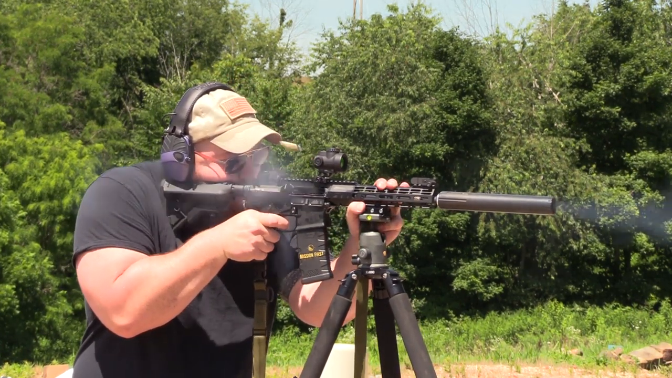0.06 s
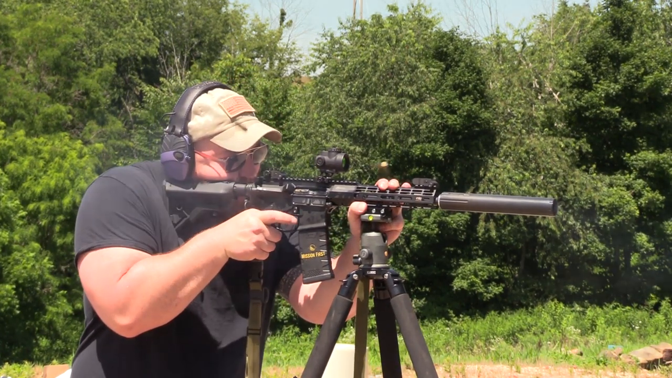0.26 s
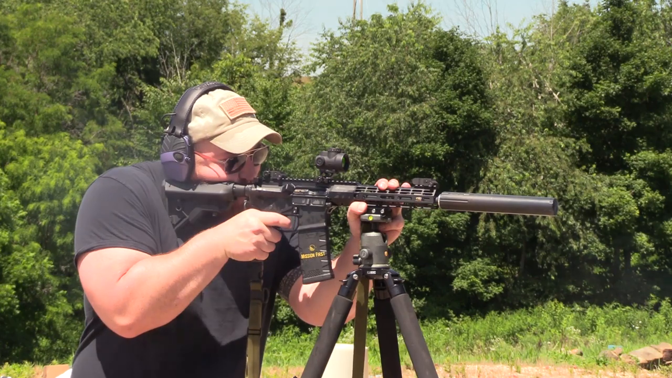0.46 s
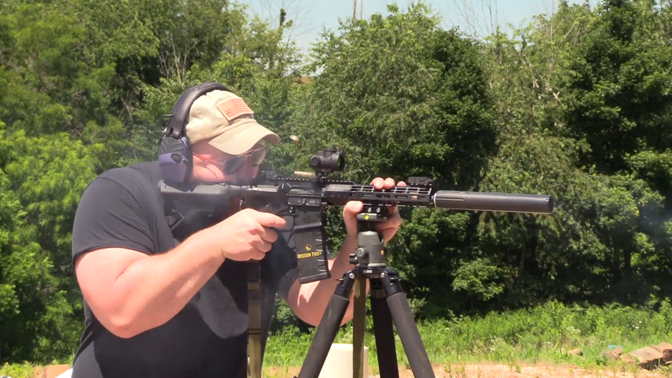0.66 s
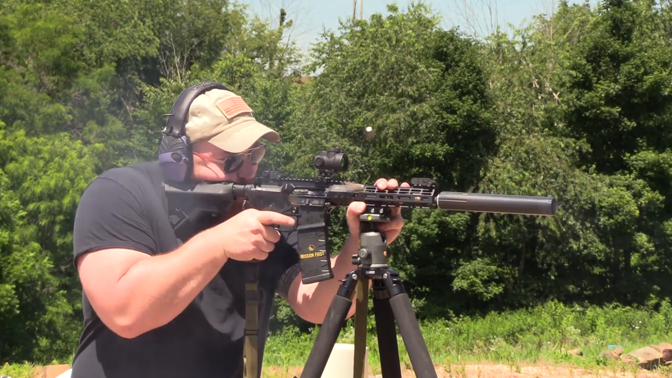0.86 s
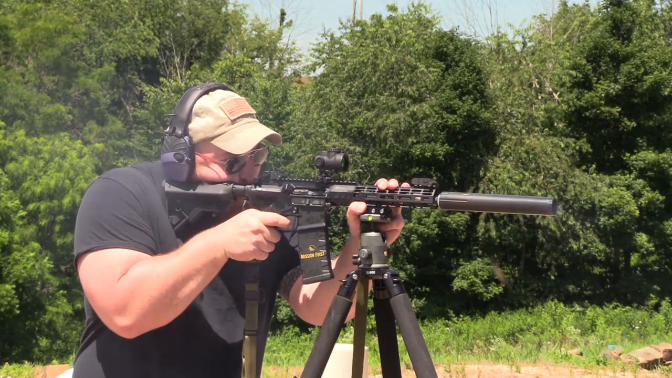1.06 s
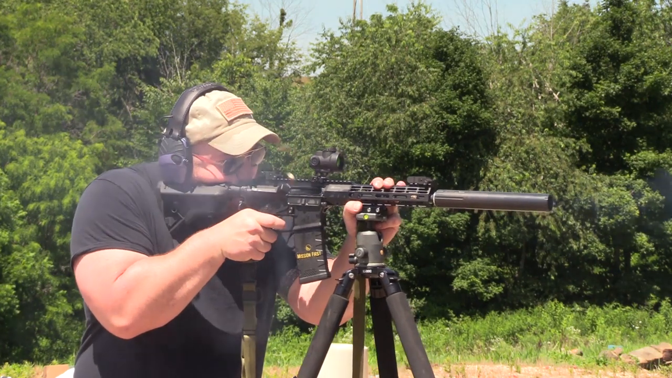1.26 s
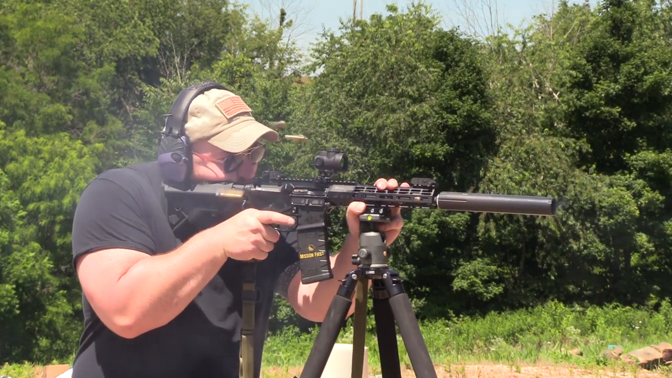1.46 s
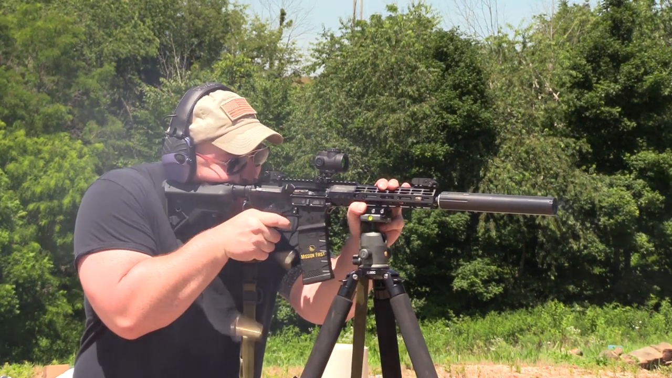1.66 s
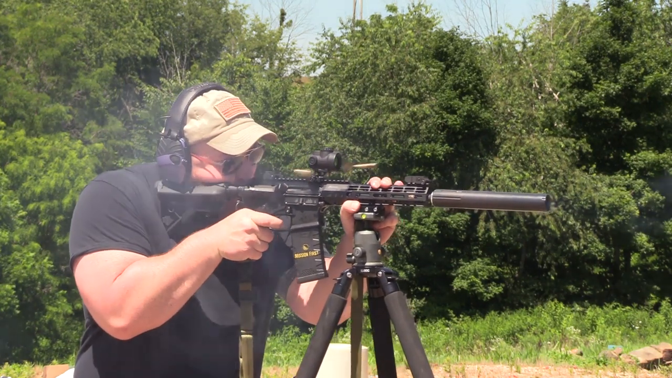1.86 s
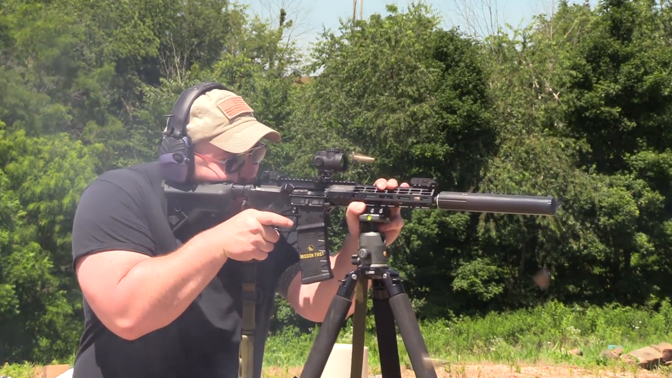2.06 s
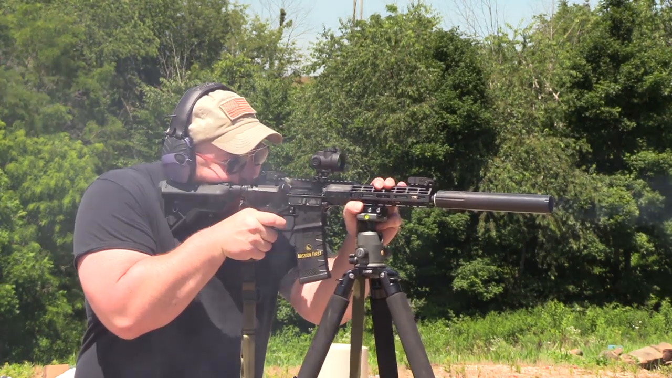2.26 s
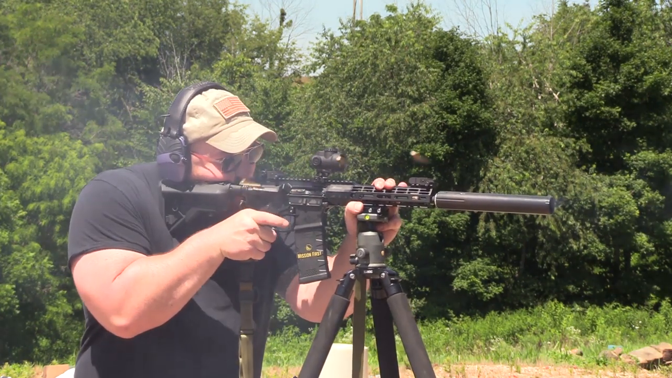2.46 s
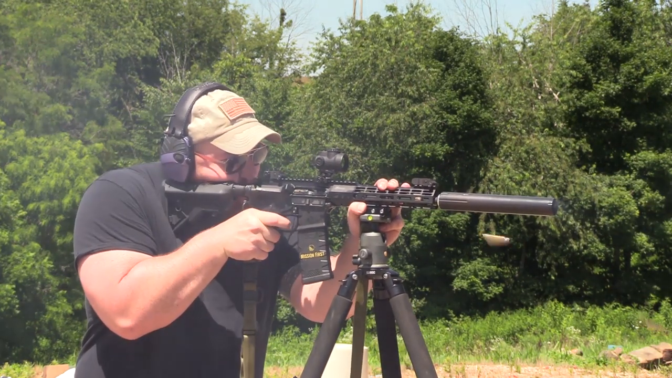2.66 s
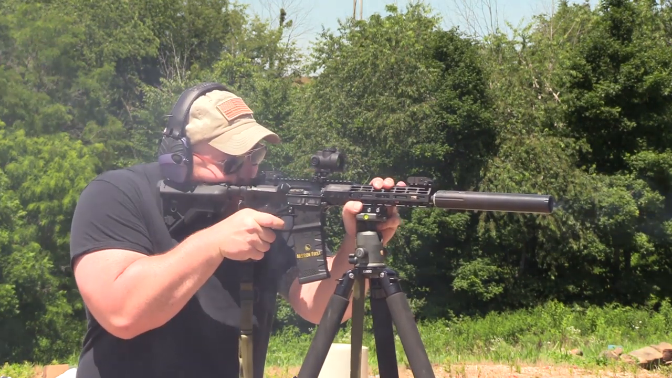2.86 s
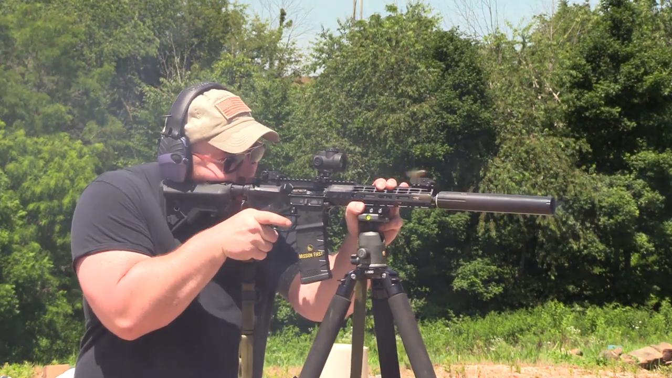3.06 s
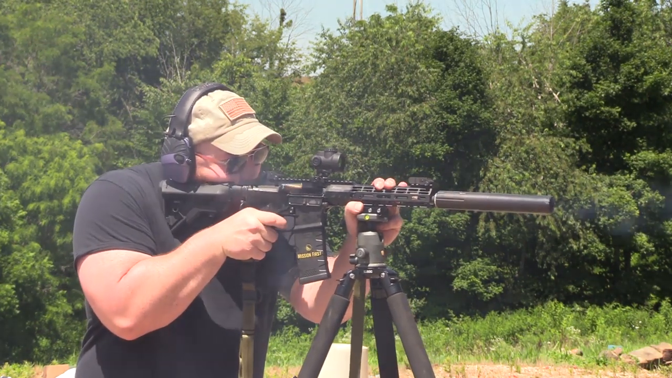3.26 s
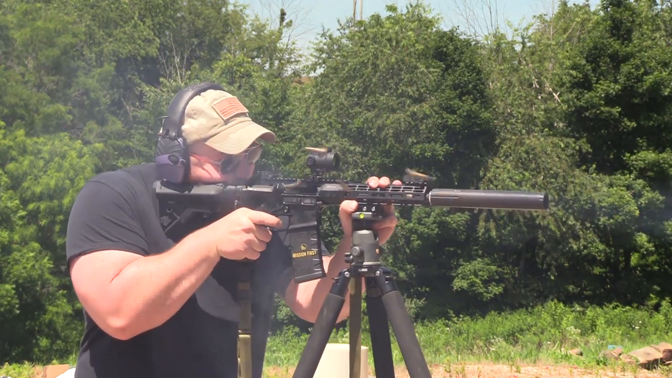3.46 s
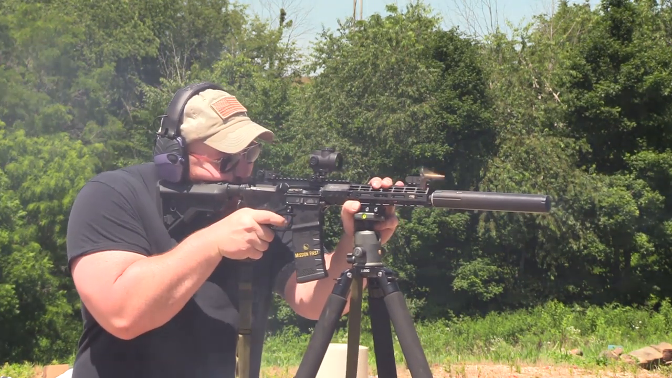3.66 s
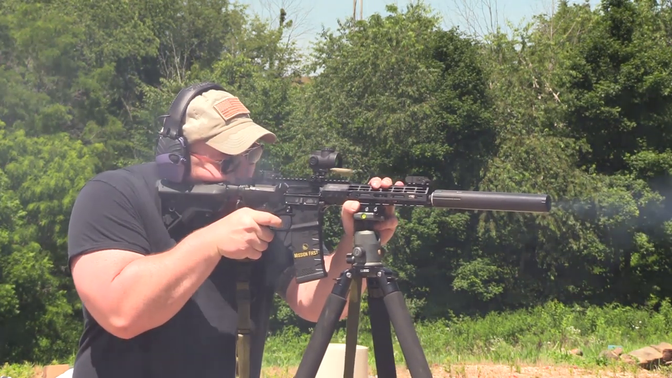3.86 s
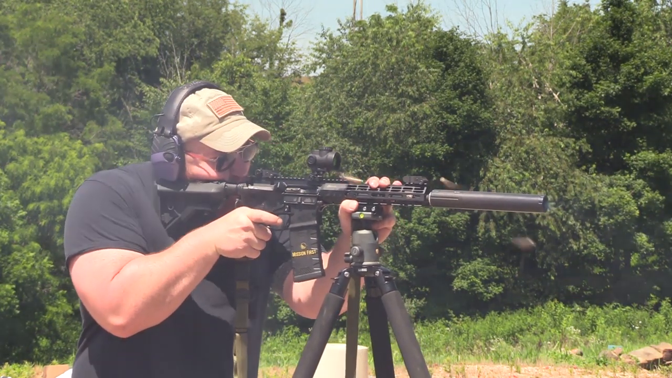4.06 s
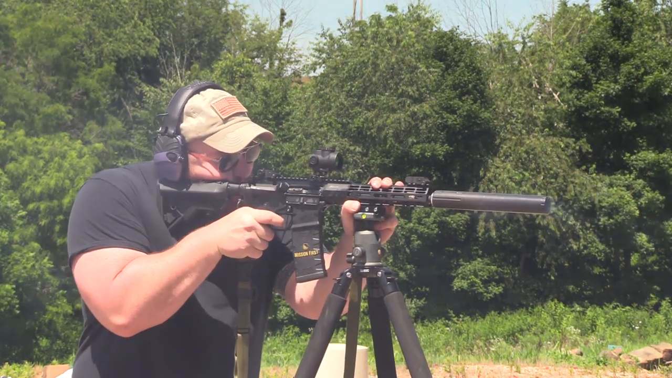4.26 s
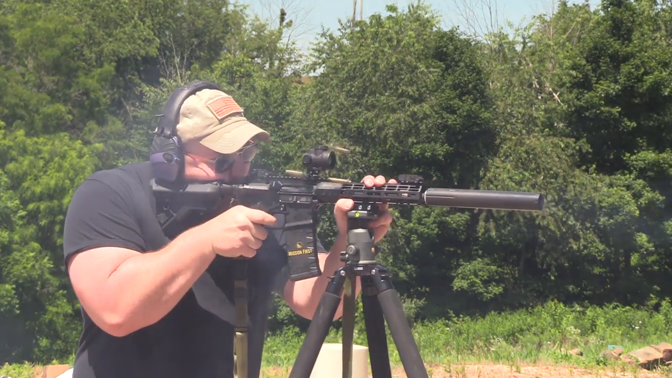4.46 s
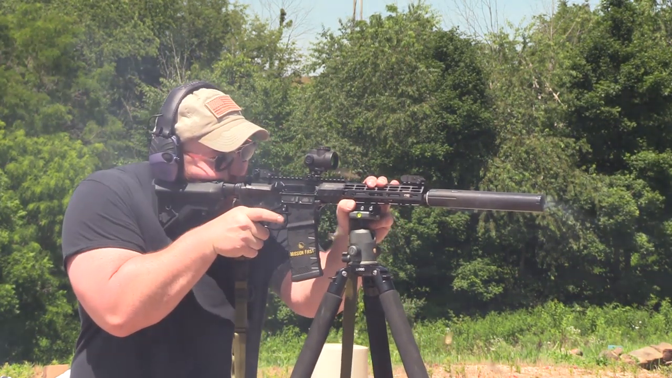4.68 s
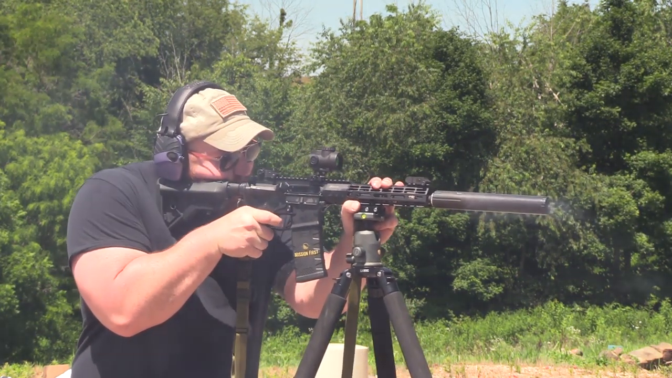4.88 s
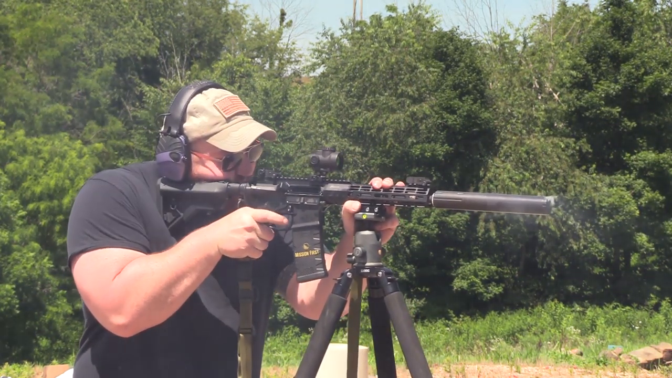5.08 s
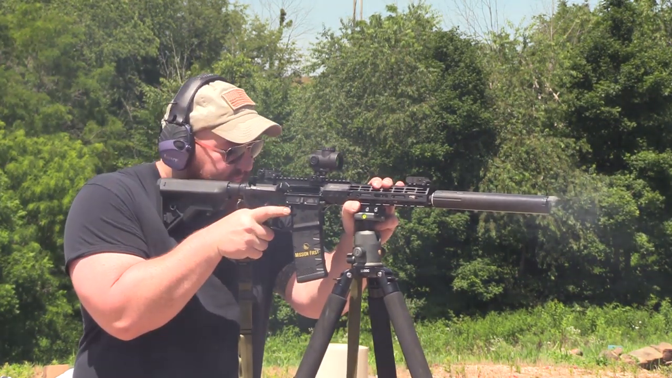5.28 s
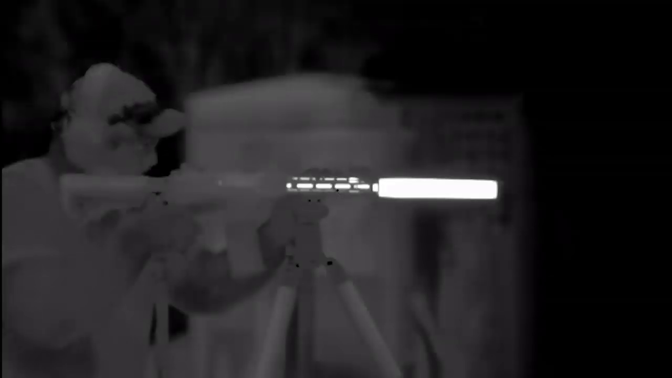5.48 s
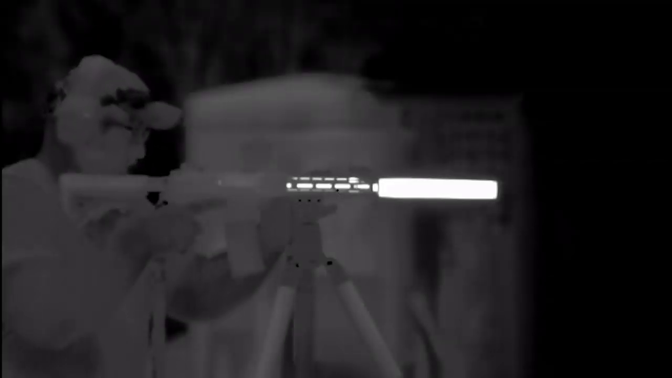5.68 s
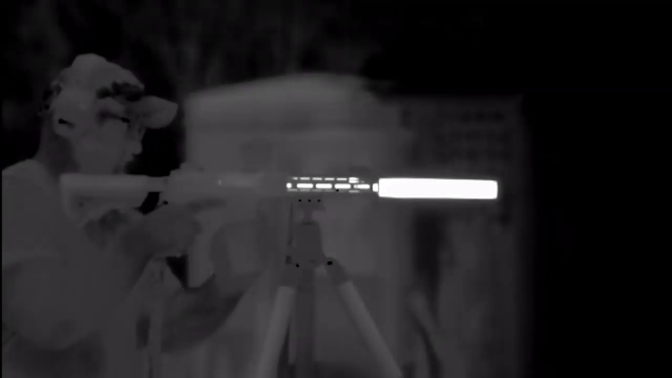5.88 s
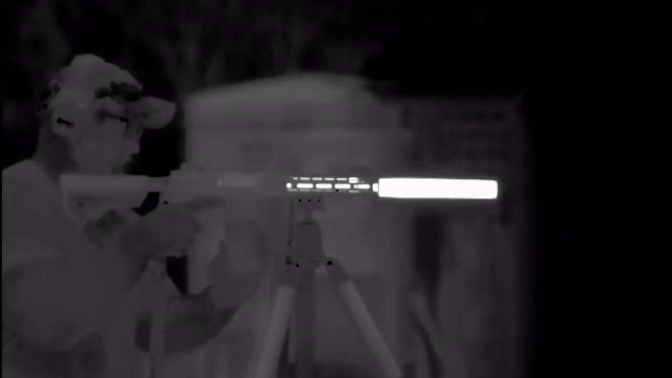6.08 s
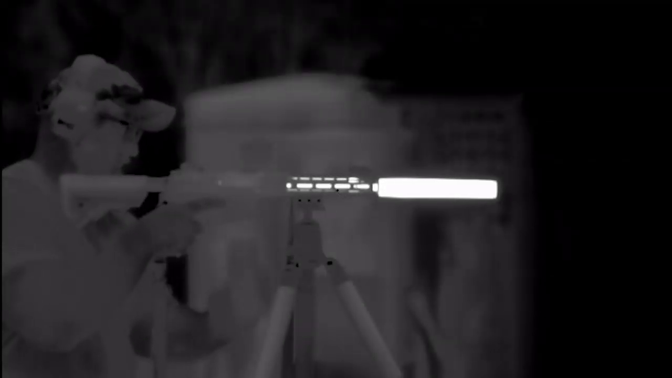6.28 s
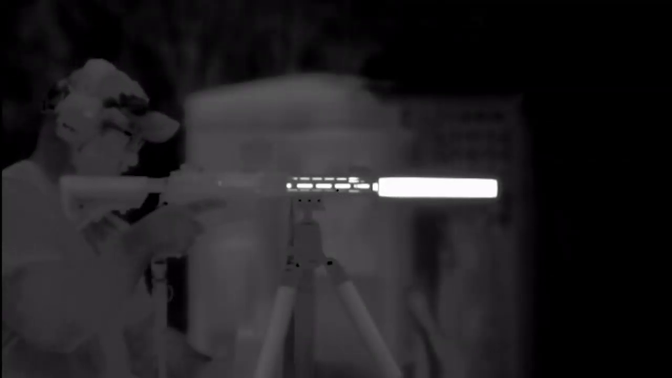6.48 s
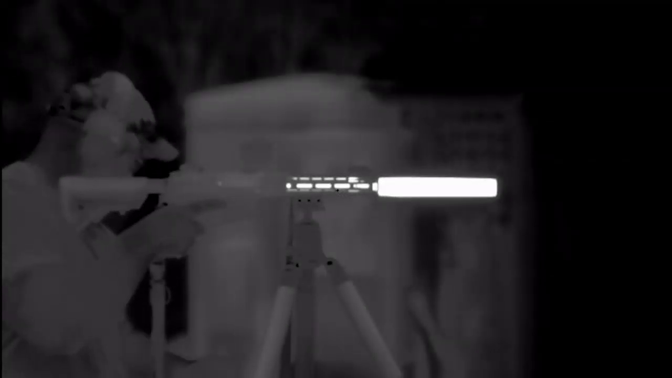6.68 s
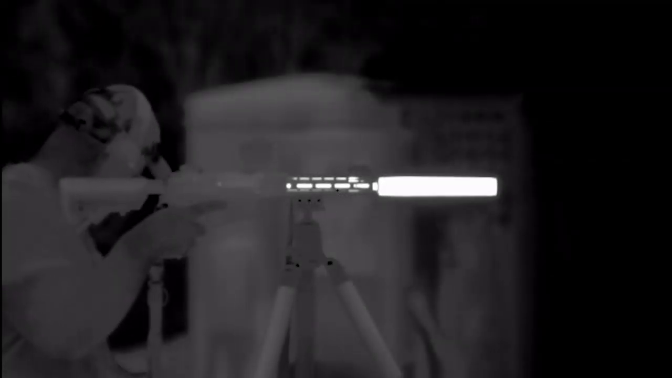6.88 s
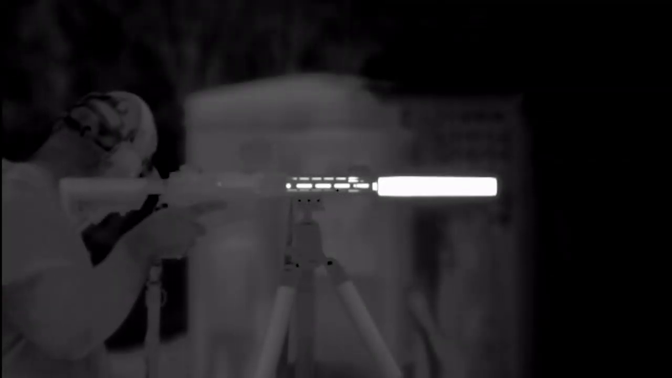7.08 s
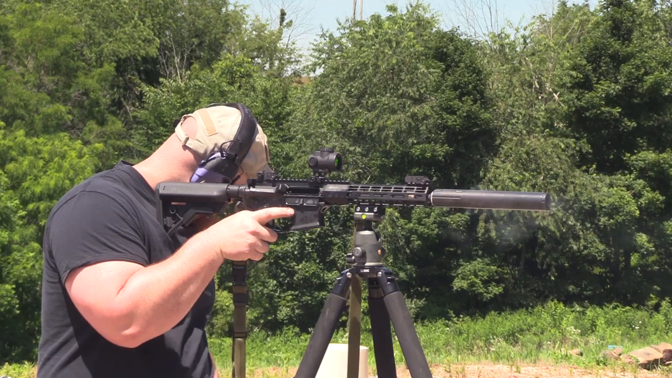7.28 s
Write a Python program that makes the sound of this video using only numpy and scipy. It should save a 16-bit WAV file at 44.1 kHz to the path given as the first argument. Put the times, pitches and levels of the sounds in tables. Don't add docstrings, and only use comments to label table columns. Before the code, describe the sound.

Nine quick bursts of harsh, clipped suppressed gunfire with tree-line echoes, followed by tinkling brass, hollow plastic knocks, a catch click and scraping magazine.

```python
import sys
import numpy as np
from scipy import signal
from scipy.io import wavfile

SR = 44100
rng = np.random.default_rng(int(sys.argv[2]) if len(sys.argv) > 2 else 0)


def gain_from_db(level_db):
    decades = np.asarray(level_db, float) / 20
    return 10 ** decades


def store_pcm(level_fs):
    pcm = np.round(np.clip(level_fs, -1, 1) * 32767).astype(np.int16)
    wavfile.write(sys.argv[1], SR, np.atleast_2d(pcm).T)


N = 323253

# t/s, overload ceiling level/dB, low push level/dB
SHOTS = [(0.0663, -6, -29), (0.137, -11.5, -35), (0.6284, -5.5, -28.5), (0.7011, -8.5, -29.5),
         (0.7707, -8.5, -28), (1.247, -5, -26.5), (1.316, -8, -30), (1.3901, -8.5, -27.5),
         (1.7693, -5.5, -18.5), (1.8399, -7.5, -33), (1.9065, -8, -32.5), (2.3162, -5, -29.5),
         (2.3843, -8, -31), (2.4514, -8, -33.5), (2.833, -5, -16), (2.8981, -8.5, -27.5),
         (2.966, -8.0, -32), (3.331, -5, -30), (3.3964, -7.5, -24.5), (3.4609, -9.0, -32),
         (3.5276, -8, -32), (3.8778, -5, -16.5), (3.9428, -8.5, -31.5), (4.0096, -8, -31),
         (4.386, -4.5, -18), (4.4489, -7.5, -19), (4.512, -8, -30.5), (4.5741, -7, -30.5)]
# f/Hz, density/dB per Hz
GAS_COLOUR = [(240, -38), (400, -5), (528, -9), (2590, 1), (2970, -1.5), (3210, 0), (3470, -1.5),
              (12100, -14.5), (16000, -18.5)]
# f/Hz, density/dB per Hz
ECHO_COLOUR = [(88, -24), (150, -2.5), (334, -11), (414, -7), (821, -17), (905, -18), (1040, -10.5),
               (3620, -1.5), (11000, -20), (16000, -32.5)]
# arrival t/s, lasting t/s, level/dB, t60/s, bass loss/dB per octave
ZONES = [
    (0.028, 0.0029, -14.5, 0.31, 0),
    (0.06, 0.053, -12, 0.13, -0.2),
    (.14, 0.016, -24, .38, 3.1),
    (.47, .08, -44, 0.97, -3.5),
    (0.803, .1, -63.5, 2.2, -9),
]
# delay t/s, level/dB, f/Hz, t60/s
FOLLOWERS = [
    (0.058, -11.5, 4950, 0.027),
    (.066, -21.5, 190, .09),
    (0.104, -14.5, 1418, 0.036),
    (.204, -37.5, 9500, 0.014),
    (0.235, -26, 932, 0.01),
    (0.238, -31, 2500, 0.11),
]
# t/s, tick level/dB, low ring level/dB, high ring level/dB
LANDINGS = [(1.059, -49, -57, -46), (1.104, -55, -54, -48), (1.508, -50, -59, -55), (2.076, -55, -52, -52),
            (2.122, -52, -57.5, -52), (2.605, -45, -66, -54), (2.68, -52, -56, -50), (3.149, -48, -42, -39),
            (3.619, -42, -59.5, -45), (4.193, -52, -61, -44), (4.22, -47, -47, -53), (4.258, -45, -41, -55),
            (4.667, -48, -64, -37), (4.841, -49, -68, -46), (5.087, -26, -40, -36), (5.098, -27, -43, -37),
            (5.186, -25, -35, -46), (5.192, -43, -33.5, -32), (5.23, -26, -65, -35)]
# f/Hz, level/dB, t60/s
BRASS_LOW = [(10722, -6, .2), (10779, 0, .2)]
BRASS_HIGH = [(15135, -1, .17), (15245, -4, .12), (15355, -9, .1)]
# t/s, tick level/dB, tick f/Hz
BOUNCES = [(5.305, -28, 7000), (5.332, -41.5, 8000), (5.355, -40, 10430), (5.411, -37, 7560),
           (5.422, -39, 8500), (5.437, -41, 8550), (5.467, -33, 5900), (5.505, -51, 10500),
           (5.54, -37.5, 5000), (5.556, -46, 8950), (5.624, -50.5, 6480), (5.634, -36.5, 5000),
           (5.691, -48, 4980), (7.212, -52, 4300)]
# t/s, level/dB, f/Hz, t60/s
CLASHES = [(1.51, -39, 15300, 0.51), (2.076, -44.5, 15450, .3), (2.64, -44.5, 15250, 0.39),
           (2.79, -55.5, 15200, 0.24), (3.617, -33, 15500, .45)]
# t/s, peak level/dB, body f/Hz, rattle level/dB against the peak
KNOCKS = [(5.98, -31, 980, -10.5), (5.986, -28, 750, -7), (6.208, -24, 1170, -23), (6.217, -48.5, 730, -4),
          (6.263, -43, 794, -21), (6.313, -40, 760, -18), (6.347, -26.5, 1140, -24),
          (6.38, -25.5, 1230, -28.5), (6.475, -35.5, 1150, -17)]
# t/s, peak level/dB, rattle level/dB against the peak
MAGAZINE_KNOCKS = [(6.743, -29, 11), (6.761, -22, -20), (6.772, -26, -13), (6.787, -19, -17),
                   (6.84, -27, -20), (6.868, -19, -19), (6.857, -19, -31), (6.91, -25, -26),
                   (6.96, -24.5, -17.5), (6.973, -27.5, -14), (7.064, -26.5, -16), (7.076, -26, -16),
                   (7.097, -34, -0.5), (7.136, -30, -17), (7.147, -27, -24), (7.159, -30, -13.5),
                   (7.173, -37, -7)]
# f/Hz, density/dB per Hz
RATTLE_COLOUR = [(120, -42), (350, -15.5), (600, -1.5), (1000, 1), (2000, -1), (3500, -1), (6000, -16.5),
                 (10000, -12), (16000, -26.5)]
# f/Hz, level/dB, t60/s
CATCH_MODES = [(554, -28, 0.075), (3440, -26.5, 0.029), (3850, -23.5, 0.024)]
# t/s, body level/dB, scrape level/dB
SLIDE = [
    (6.741, -49, -41),
    (6.759, -39, -32.5),
    (6.827, -45, -42),
    (6.861, -36.5, -41.5),
    (6.927, -52, -57.5),
    (6.94, -59, -68),
]
# f/Hz, density/dB per Hz
SCRAPE_COLOUR = [(180, -50.5), (300, -16), (667, -10), (725, -18.5), (1010, -4.5), (1170, -12.5),
                 (3400, -18.5), (11900, -26), (16000, -28)]
# f/Hz, rms level/dB
HUM = [(92.0, -50), (100.6, -49), (145.3, -66.5), (167.8, -64.5), (184.5, -65), (257.3, -68.5),
       (330.8, -61), (514.5, -65), (698.5, -68)]
# f/Hz, density/dB per Hz
AIR_COLOUR = [(18, -4), (40, -3), (90, 0.5), (200, -1), (400, -6), (800, -10), (1300, -17.5), (2000, -21.5),
              (3500, -26.5), (6000, -43.5), (10000, -45), (16000, -52.5)]
BAND_EDGES_HZ = 18 * 2 ** np.arange(0, 10.1, .5)

EARLIER_SHOT_S = -2.2
OPEN_S, HOLD_S, COLLAPSE_S = 0.0011, 0.0046, 0.0073
OPEN_DB, HOLD_DB, COLLAPSE_DB, LEAK_DB_PER_S = 10, 10, -4, 1251.5
TUBE_HZ = 265
GROUND_S, GROUND_SHARE = .00312, 0.43
BUILD_UP = .33
AIR_LOSS_DB_PER_S, AIR_LOSS_TOP_DB = 30.5, 9
LUMP_DB, LUMP_S = 2, .007
ROLL_RING_DB, ROLL_FADE_DB_PER_S = -56.5, 23.5
MAGAZINE_HZ, CATCH_S = 997, 6.742
AIR_DB, IN_STEP_S = -50.5, 8
DUCK_DB, RESTED_DB, WAIT_S, CLIMB_S = -20.5, -2, .19, 0.23
IN_BURST_DB = -21.5
DUCK_FOLLOWS, USUAL_CEILING_DB = 1.6, -8
LOW_CUT_HZ = 5.5


def rms_one(x):
    return x / np.sqrt(np.mean(x ** 2) + 1e-20)


def at_hz(points, hz):
    curve_hz, curve_db = np.array(points)[:, 0], np.array(points)[:, 1]
    return np.interp(np.log(hz), np.log(curve_hz), curve_db)


def clicks(seconds, sizes):
    out = np.zeros(N)
    np.add.at(out, np.round(np.asarray(seconds) * SR).astype(int), sizes)
    return out


def ring(x, hz, t60):
    r, w = gain_from_db(-60 / (t60 * SR)), 2 * np.pi * hz / SR
    return signal.lfilter([0, np.sin(w)], [1, -2 * r * np.cos(w), r * r], x + 1e-18)


def dying(x, t60):
    return signal.lfilter([1], [1, -gain_from_db(-60 / (t60 * SR))], x + 1e-18)


def band(low_hz, high_hz, white=None):
    white = rng.standard_normal(N) if white is None else white
    return signal.sosfilt(signal.butter(2, [low_hz, high_hz], "band", fs=SR, output="sos"), white)


def coloured(spectrum):
    centres_hz = np.sqrt(BAND_EDGES_HZ[1:] * BAND_EDGES_HZ[:-1])
    white = rng.standard_normal((2, N))
    bands = []
    for k, hz in enumerate(centres_hz):
        noise = band(BAND_EDGES_HZ[k], BAND_EDGES_HZ[k + 1], white[k % 2])
        bands.append(gain_from_db(at_hz(spectrum, hz)) * noise)
    bands = np.array(bands)
    return centres_hz, bands / np.std(bands.sum(axis=0))


def coloured_noise(spectrum):
    return coloured(spectrum)[1].sum(axis=0)


def whistling(x, hz, width_hz, share):
    r, w = np.exp(-np.pi * width_hz / SR), 2 * np.pi * hz / SR
    resonance = signal.lfilter([1, 0, -1], [1, -2 * r * np.cos(w), r * r], x)
    return rms_one(rms_one(x) + share * rms_one(resonance))


def since_shot():
    t, starts = np.arange(N) / SR, np.r_[EARLIER_SHOT_S, np.array(SHOTS)[:, 0]]
    last = np.searchsorted(starts, t, side="right") - 1
    return np.maximum(last - 1, 0), t - starts[last]


def ceiling():
    return gain_from_db(np.array(SHOTS)[since_shot()[0], 1] - 0.36)


def muzzle():
    s, top_db, push_db = np.transpose(SHOTS)
    jet = whistling(coloured_noise(GAS_COLOUR), hz=3690, width_hz=850, share=0.38)
    passed = since_shot()[1]
    flow_db = np.interp(passed, [0, OPEN_S, HOLD_S, COLLAPSE_S], [-41.5, OPEN_DB, HOLD_DB, COLLAPSE_DB])
    flow_db = flow_db - LEAK_DB_PER_S * np.maximum(passed - COLLAPSE_S, 0)
    gas = ceiling() * gain_from_db(flow_db) * jet
    lag = round(GROUND_S * SR)
    off_ground = GROUND_SHARE * np.r_[np.zeros(lag), gas[:-lag]]
    tube_db = top_db + 1.0 + 3.4 * rng.standard_normal(len(s))
    tube = ring(clicks(s + 0.0021, gain_from_db(tube_db)), TUBE_HZ, t60=0.025)
    quick = ring(clicks(s + 0.0011, gain_from_db(push_db + 20)), hz=117, t60=0.031)
    slow = ring(clicks(s + 0.0058, -gain_from_db(push_db + 18.5)), hz=42.5, t60=0.033)
    return gas + off_ground + tube + quick + slow


def followers():
    s, out = np.array(SHOTS)[:, 0], 0
    for lag, level_db, hz, t60 in FOLLOWERS:
        sizes = gain_from_db(level_db + 1.8 * rng.standard_normal(len(s)))
        out = out + dying(clicks(s + lag, sizes), t60) * rms_one(band(hz / 1.6, hz * 1.6))
    return out


def zone_power(t, hz):
    air_db = np.minimum(AIR_LOSS_DB_PER_S * t, AIR_LOSS_TOP_DB) * max(np.log2(hz / 3800), 0)
    octaves_down = np.clip(np.log2(3400 / hz), 0, 1.6)
    power = 0
    for at, lasts, level_db, t60, bass in ZONES:
        swell = np.clip((t / at - 1) / BUILD_UP + 1, 0, 1) ** 2
        fade_db = 60 * np.maximum(t - at - lasts, 0) / t60
        power = power + swell * gain_from_db(2 * (level_db - air_db - bass * octaves_down - fade_db))
    return power


def echoes():
    step = 21
    t = np.arange(0, 2, step / SR)
    fired = np.zeros(N // step + 1)
    fired[(np.array(SHOTS)[:, 0] * SR / step).astype(int)] = 1
    points = np.arange(len(fired))
    out = 0
    for hz, noise in zip(*coloured(ECHO_COLOUR)):
        power = np.maximum(signal.fftconvolve(fired, zone_power(t, hz))[:len(fired)], 0)
        lumps = np.interp(points * step / SR / LUMP_S, np.arange(3000), rng.standard_normal(3000))
        power = power * gain_from_db(2 * LUMP_DB * lumps)
        out = out + noise * np.interp(np.arange(N) / step, points, np.sqrt(power))
    count = N // 120 + 2
    leaves = np.interp(np.arange(N) / 120, np.arange(count), rng.standard_normal(count))
    out = out * gain_from_db(1.5 * leaves)
    return np.std(out) * whistling(out, hz=3650, width_hz=600, share=0.2)


def cases():
    strikes = list(LANDINGS)
    for at, db, _ in BOUNCES:
        roll_db = ROLL_RING_DB - ROLL_FADE_DB_PER_S * (at - BOUNCES[0][0])
        strikes.append((at, db - 14, roll_db, roll_db))
    s, tick_db, low_db, high_db = np.transpose(strikes)
    out = ring(clicks(s, gain_from_db(tick_db + 6)), 4800, .0012)
    out += dying(clicks(s, gain_from_db(tick_db - 9)), .006) * rms_one(band(2500, 12000))
    for modes, strike_db in (BRASS_LOW, low_db), (BRASS_HIGH, high_db):
        scatter_db = 2.5 * rng.standard_normal((len(s), len(modes)))
        for k, (hz, level_db, t60) in enumerate(modes):
            out += ring(clicks(s, gain_from_db(strike_db + level_db + scatter_db[:, k])), hz, t60)
    return out


def bounces():
    out, short = np.zeros(N), np.arange(600) / SR
    for at, db, hz in BOUNCES:
        grit = gain_from_db(db - 7.0 - 60 * short / .0022) * rng.standard_normal(len(short))
        tick = ring(ring(grit, hz, t60=.0004), hz, t60=.0004)
        out[round(at * SR):][:len(short)] += tick
    for at, db, hz, t60 in CLASHES:
        out += ring(clicks([at], gain_from_db(db)), hz, t60)
    return out


def handling():
    knocks = list(KNOCKS)
    for at, db, dry_db in MAGAZINE_KNOCKS:
        knocks.append((at, db, MAGAZINE_HZ * (1 + 0.054 * rng.standard_normal()), dry_db))
    s, peak_db, body_hz, rattle_db = np.transpose(knocks)
    rattle = coloured_noise(RATTLE_COLOUR)
    out = rattle * dying(clicks(s, gain_from_db(peak_db + rattle_db - 6.5)), t60=0.038)

    slide_s, body_db, scrape_db = np.transpose(SLIDE)
    t = np.arange(N) / SR
    body = gain_from_db(np.interp(t, slide_s, body_db, left=-150, right=-150))
    scrape = gain_from_db(np.interp(t, slide_s, scrape_db, left=-150, right=-150))
    slips = rms_one(dying((rng.random(N) < 400 / SR) * rng.random(N), .018) + .42)
    out += scrape * slips * whistling(coloured_noise(SCRAPE_COLOUR), hz=3445, width_hz=500, share=0.39)
    hoot = ring(slips * rattle, 1000, .035) + .8 * ring(slips * rattle, 1350, .02)
    out += gain_from_db(-1) * body * rms_one(hoot)
    for hz, level_db, t60 in CATCH_MODES:
        out += ring(clicks([CATCH_S], gain_from_db(level_db)), hz, t60)

    after = np.arange(4000) / SR
    for at, level_db, hz in zip(s, peak_db, body_hz):
        notes = np.sin(2 * np.pi * hz * after) + 0.29 * np.sin(2 * np.pi * 1.325 * hz * after)
        part = out[round(at * SR):][:len(after)]
        part += (gain_from_db(level_db - 8.5 - 60 * after / 0.021) * notes)[:len(part)]
    return out


def background():
    t = np.arange(N) / SR - IN_STEP_S
    tones = sum(np.sqrt(2) * gain_from_db(level_db) * np.cos(2 * np.pi * hz * t) for hz, level_db in HUM)
    return tones + gain_from_db(AIR_DB) * coloured_noise(AIR_COLOUR)


def duck_db():
    last, passed = since_shot()
    s, top_db, _ = np.transpose(SHOTS)
    after_burst_db = DUCK_DB + DUCK_FOLLOWS * (top_db - USUAL_CEILING_DB)
    depth_db = np.where(np.diff(s, append=99) < .1, IN_BURST_DB, after_burst_db)
    climb = np.maximum(passed - WAIT_S, 0) / CLIMB_S
    return RESTED_DB + (depth_db[last] - RESTED_DB) * (1 + climb) * np.exp(-climb)


def scene():
    ducked = echoes() + followers() + cases() + bounces() + background()
    return (muzzle() + gain_from_db(duck_db()) * ducked + handling())[None]


def low_pass(x):
    return signal.sosfilt(signal.butter(12, 16960, fs=SR, output="sos"), x)


def record(dry):
    clipped = dry / (1 + (dry / ceiling()) ** 8) ** (1 / 8)
    coupled = signal.sosfilt(signal.butter(2, LOW_CUT_HZ, "high", fs=SR, output="sos"), clipped)
    mix = signal.sosfiltfilt(signal.cheby2(10, 22, 16000, fs=SR, output="sos"), coupled)
    return low_pass(mix)


dry = scene()
out = record(dry)
store_pcm(out)
```